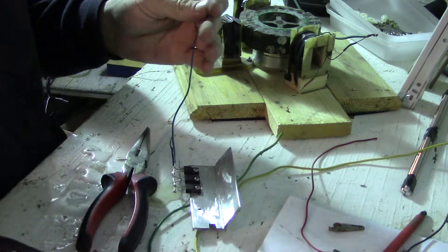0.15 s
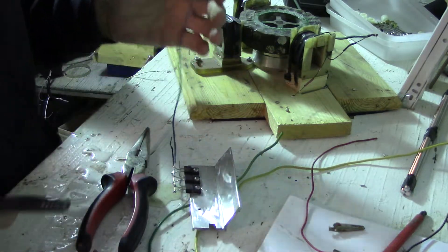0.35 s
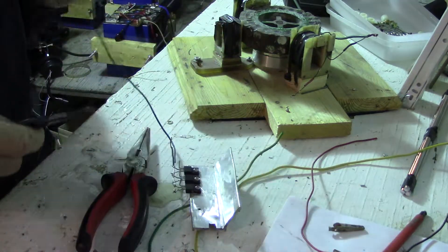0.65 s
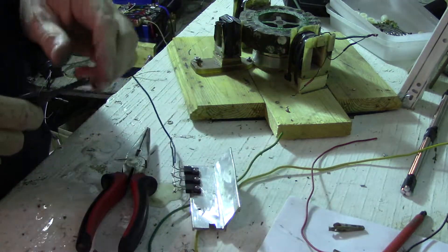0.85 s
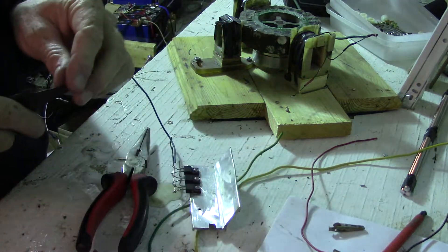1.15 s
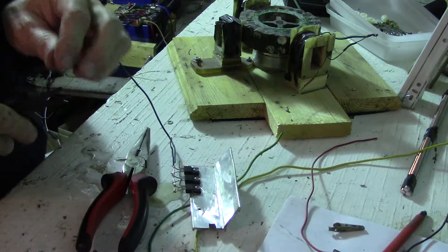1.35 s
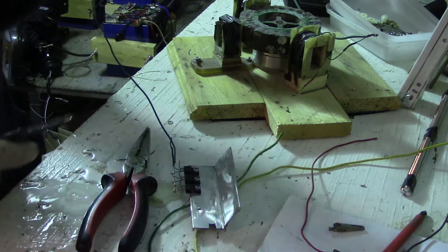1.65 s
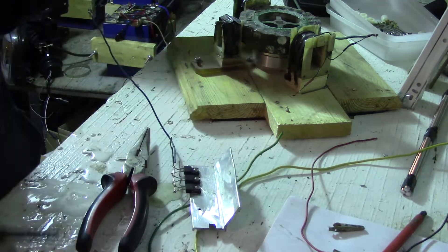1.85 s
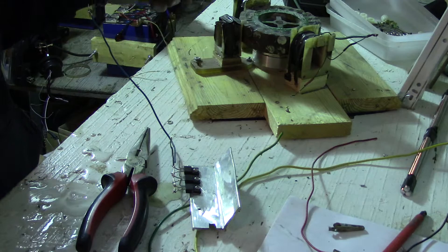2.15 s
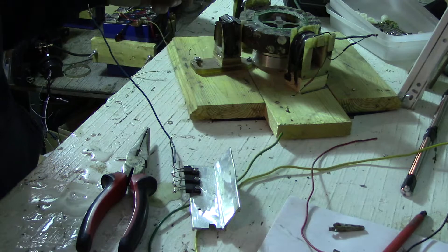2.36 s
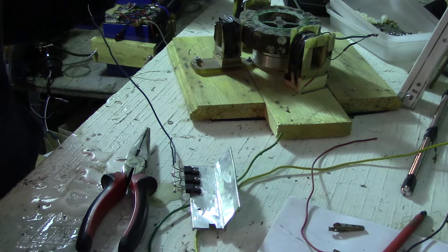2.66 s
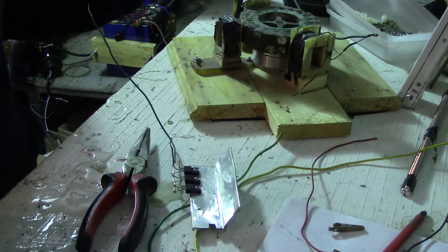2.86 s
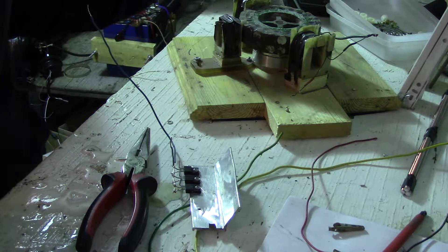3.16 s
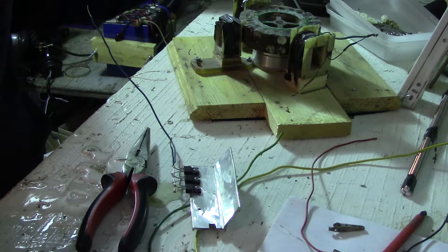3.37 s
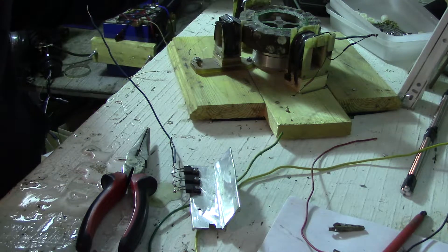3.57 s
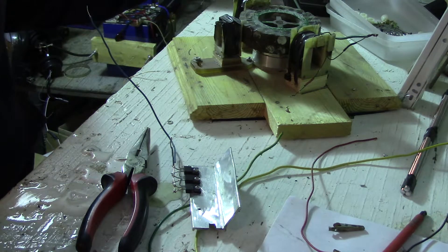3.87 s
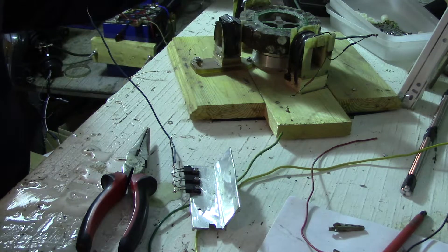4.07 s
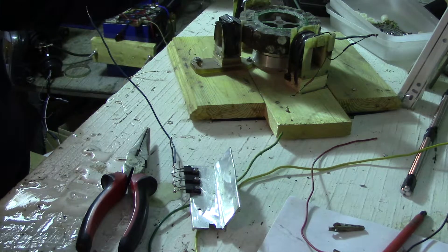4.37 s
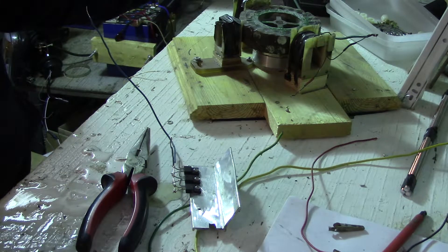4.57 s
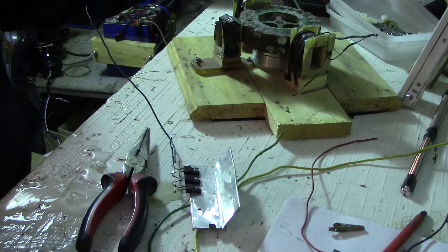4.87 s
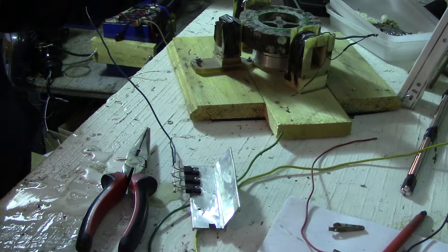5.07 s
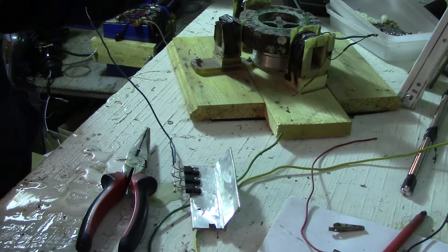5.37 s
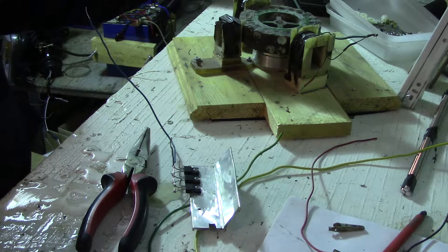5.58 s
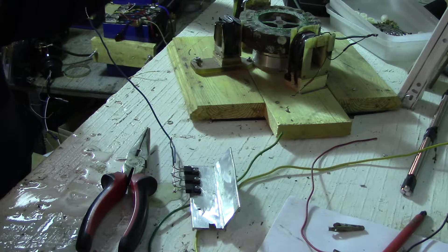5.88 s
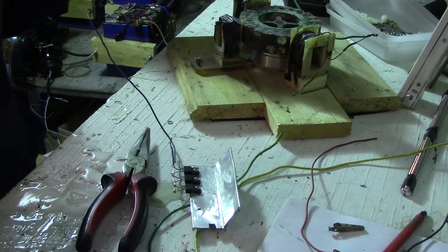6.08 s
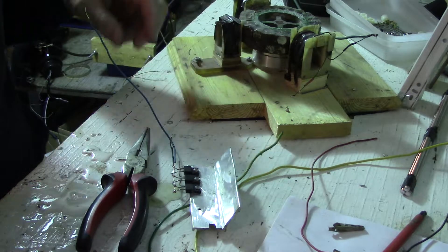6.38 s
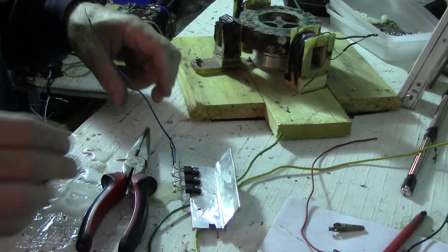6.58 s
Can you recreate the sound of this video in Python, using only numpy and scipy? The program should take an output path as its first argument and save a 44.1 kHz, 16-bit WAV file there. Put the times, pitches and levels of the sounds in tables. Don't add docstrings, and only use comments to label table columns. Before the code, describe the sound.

A steady electrical buzz fills a workbench while wire rubs and small metal clicks sound, then a tool drops and clatters loudly on the wood.

```python
import sys
import numpy as np
from scipy import signal
from scipy.fft import rfft, irfft, next_fast_len
from scipy.io import wavfile
from scipy.ndimage import uniform_filter1d

SR = 44100
rng = np.random.default_rng(int(sys.argv[2]) if len(sys.argv) > 2 else 0)


def dump(signal):
    limited = np.clip(np.atleast_2d(signal).T, -1, 1)
    pcm = np.round(limited * 32767).astype(np.int16)
    wavfile.write(sys.argv[1], SR, pcm)


def gain_from_db(level_db):
    decades = np.asarray(level_db, float) / 20
    return 10 ** decades


N = 296793
BUZZ_HZ = 120.033
OPPOSED = np.array([[1], [-1]])


def colour(x, points):
    hz, db = np.transpose(points)
    size = next_fast_len(x.shape[-1])
    f = np.maximum(np.fft.rfftfreq(size, 1 / SR), 1)
    gain = gain_from_db(np.interp(np.log(f), np.log(hz), db, left=-90, right=-90))
    return irfft(rfft(x, size) * gain, size)[..., :x.shape[-1]]


def walk(rate):
    hold = int(SR / rate)
    steps = np.repeat(rng.standard_normal(N // hold + 1), hold)
    return 4 / 3 * uniform_filter1d(uniform_filter1d(steps, hold), hold)[:N]


def resonate(x, hz, width):
    b, a = signal.iirpeak(hz, hz / width, SR)
    return signal.lfilter(b, a, signal.lfilter(b, a, x))


def ring_modes(out, at_s, db, modes, stretch, scatter_db=1.5, detune=0.016, rise_s=0.0005):
    hz, mode_db, t60 = np.transpose(modes)[:, :, None]
    level_chance, pitch_chance, phase_chance = rng.standard_normal((3, len(modes), 1))
    start = int(at_s * SR)
    t = np.arange(min(SR // 4, N - start)) / SR
    swing = np.sin(2 * np.pi * hz * (1 + detune * pitch_chance) * t + 0.4 * phase_chance)
    decay_db = -60 * t / (t60 * max(stretch, .005))
    ringing = np.sum(gain_from_db(mode_db + scatter_db * level_chance + decay_db) * swing, axis=0)
    ringing *= 1 - np.exp(-t / max(rise_s, 1e-5))
    out[start:start + len(t)] += gain_from_db(db) * ringing / np.abs(ringing).max()


def crack(at_s, db, t60, points):
    out = np.zeros(N)
    t = np.arange(SR // 8) / SR
    for s, peak_db, decay in zip(at_s, db, t60):
        burst = colour(rng.standard_normal(len(t)), points)
        burst = burst * gain_from_db(-60 * t / max(decay, .003)) * (1 - np.exp(-t / 0.0001))
        start = int(s * SR)
        out[start:start + len(t)] += gain_from_db(peak_db) * burst / np.abs(burst).max()
    return out


# (multiple, level [dB rms])
HOUSING_MULTIPLES = [(2, -62), (3.5, -75), (4, -66), (5, -76), (6, -77), (8, -64), (9, -61), (10, -61),
                     (11, -68), (13, -73), (14, -74), (15, -72), (16, -67), (19, -67), (20, -80), (21, -77),
                     (24, -74), (25, -77), (26, -74), (29, -72), (30, -71), (31, -76), (32, -76), (33, -80),
                     (36, -71), (43, -75), (48, -78), (53, -76)]


def multiples():
    faint = np.setdiff1d(np.arange(12, 72), np.transpose(HOUSING_MULTIPLES)[0])
    faint_db = -77.5 - .26 * faint + 2.5 * rng.standard_normal(len(faint))
    tick, crest = np.arange(105, 126), 108.5
    ripple = np.abs(1 + .7 * np.exp(2j * np.pi * (tick - crest) / 4.7))
    tick_db = -93 - .6 * np.abs(tick - crest) + 20 * np.log10(ripple)
    return [*HOUSING_MULTIPLES, *zip(faint, faint_db), *zip(tick, tick_db)]


def hum():
    turn = 2 * np.pi * BUZZ_HZ * np.arange(N) / SR
    knots = np.linspace(0, N, 8)
    out = np.zeros(N)
    for k, db in multiples():
        gain = np.interp(np.arange(N), knots, gain_from_db(db + .5 * rng.standard_normal(len(knots))))
        lag = k * k / 5 + (k > 10) * (np.pi + (k - 10) / 4 * rng.standard_normal())
        if k >= 100:
            lag = (k - 112) ** 2 / 40
        out += gain * np.cos(k * turn - lag)
    return np.sqrt(2) * gain_from_db(1.36) * out


def sizzle():
    cycle = (np.arange(N) * BUZZ_HZ / SR) % 1
    spit = colour(rng.standard_normal(N), [(11500, -27), (12800, 1), (14300, 3), (15700, -10)])
    peaks = np.exp(-5 * np.minimum(cycle, 1 - cycle))
    return 3 * gain_from_db(-90) * peaks * spit / spit.std()


# (frequency [Hz], density [dB per Hz])
AIR_COLOUR = [(20, -22), (100, -5), (220, 0.5), (800, -4.5), (1500, -8.5), (6000, -17), (13500, -27.5),
              (15700, -34)]
# (frequency [Hz], side minus mid [dB])
AIR_WIDTH = [(20, -12), (100, -8.5), (500, -5.5), (1000, -7), (2000, -8), (3000, -6.5), (6000, -10.5),
             (15700, -13)]
# (frequency [Hz], width [Hz], mid level [dB], side level [dB])
FAN_WHISTLES = [(1340, 80, -12.5, -27), (2020, 100, -34, -36), (2390, 71, -20.5, -18.5)]


def air():
    mid, side, draught, aside = rng.standard_normal((4, N))
    mid = colour(mid, AIR_COLOUR)
    side = colour(colour(side, AIR_COLOUR), AIR_WIDTH)
    size = mid.std()
    for hz, width, mid_db, side_db in FAN_WHISTLES:
        unit = size * np.sqrt(SR / width)
        mid = mid + unit * gain_from_db(mid_db) * resonate(draught, hz, width)
        side = side + unit * gain_from_db(side_db) * resonate(aside, hz, width)
    swell = gain_from_db(-59.5 + .5 * walk(2.64))
    return swell / size * (mid + side * OPPOSED)


# (start [s], hold [s], hiss level [dB], scrape level [dB])
STROKES = [(0.0, 0.17, -76, -56.5), (0.3, 0.11, -76, -51.5), (0.45, 0.14, -67.5, -54.5),
           (.68, 0.066, -73.5, -58), (0.845, 0.37, -76.5, -63.5), (1.196, .08, -74, -65),
           (1.87, .03, -84, -85), (3.473, 0.064, -75.5, -66), (4.35, 0.035, -71.5, -59.5),
           (5.88, .03, -83, -80), (6.03, .012, -71.5, -59.5)]
# (frequency [Hz], density [dB per Hz])
CLOTH_HISS = [(700, -25), (1500, 9), (3000, 6), (5000, -1.5), (6200, 5), (8000, -3.5), (11000, -7.5),
              (15500, -20)]
# (frequency [Hz], width [Hz], level [dB])
SCRAPE_MODES = [(330, 210, -10.5), (564, 350, -14), (956, 174, -10), (2030, 160, -12.5)]


def rub():
    t = np.arange(N) / SR
    rise_db_s, fall_db_s = 108, 103
    hiss_gain, scrape_gain = np.zeros((2, N))
    for s, hold_s, hiss_db, scrape_db in STROKES:
        swelling_db = rise_db_s * np.maximum(s - t, 0)
        dying_db = fall_db_s * np.maximum(t - s - hold_s, 0)
        stroke = gain_from_db(-swelling_db - dying_db)
        hiss_gain = np.maximum(hiss_gain, gain_from_db(hiss_db) * stroke)
        scrape_gain = np.maximum(scrape_gain, gain_from_db(scrape_db) * stroke)
    mid, side = rng.standard_normal((2, N))
    grain = gain_from_db(1.5 * walk(120))
    noise = (mid + 0.1 * side * OPPOSED) * grain
    scrape = sum(gain_from_db(db) * resonate(noise, hz, width) for hz, width, db in SCRAPE_MODES)
    hiss = colour(noise, CLOTH_HISS)
    return gain_from_db(11.0) * hiss_gain * hiss / hiss.std() + scrape_gain * scrape / scrape.std()


# (frequency [Hz], level [dB], t60 [s])
TOOL_MODES = [(1422, -2, 0.1), (1503, -7.5, .06), (1680, 0.5, 0.07), (1737, -10.5, 0.06),
              (2133, -9.5, 0.054), (2218, 4.5, 0.032), (2750, -10.5, 0.06), (2980, -18, 0.079),
              (3420, -17, 0.06)]
# (frequency [Hz], density [dB per Hz])
WOOD_CRACK = [(150, -39), (300, -9.5), (550, 1), (800, -2.5), (1300, -17)]
# (frequency [Hz], density [dB per Hz])
LOOSE_RATTLE = [(500, -47), (1000, 17), (1500, 8.5), (2300, -3), (3200, -8), (4500, -17.5), (6500, -20.5)]
# (frequency [Hz], density [dB per Hz])
BRIGHT_CHINK = [(2500, -6), (3500, 4.5), (5000, 0.5), (7500, -2), (10300, -15.5), (12500, -18),
                (15500, -23)]


def strike(blows, board, thud, stretch):
    out = np.zeros(N)
    for s, board_db, thud_db, tool_db, _ in blows:
        ring_modes(out, s, board_db - 3.5, board, 0.72 * stretch, detune=0.011)
        ring_modes(out, s, thud_db + 0.5, thud, 0.85 * stretch, rise_s=0.0054, detune=0.02)
        ring_modes(out, s, tool_db - 1.5, TOOL_MODES, 0.54 * stretch, detune=0.012)
    s, board_db, _, tool_db, chink_db = np.transpose(blows)
    held = stretch * np.ones(len(s))
    out += crack(s, board_db - 12, 0.13 * held, WOOD_CRACK)
    out += crack(s, tool_db - 5.0, 0.13 * held, LOOSE_RATTLE)
    return out + crack(s, chink_db, 0.032 * held, BRIGHT_CHINK)


# (time [s], board [dB], thud [dB], tool ring [dB], chink [dB])
PART_BUMPS = [(0.0, -20.5, -30, -39.5, -42), (0.021, -26.5, -43, -65, -60), (0.035, -26.5, -58, -53, -50),
              (0.059, -36, -45, -48, -59), (0.084, -37, -55, -53, -59), (0.108, -37, -61, -57, -59),
              (0.274, -39.5, -55, -58, -60), (0.409, -43.5, -51, -45, -60), (2.946, -54, -52, -60, -62),
              (3.012, -49, -55, -44, -62), (4.344, -33, -64, -41.5, -48), (4.361, -35, -79, -38, -58),
              (4.375, -35, -46, -51, -52), (4.389, -35, -49, -46, -50), (4.41, -32, -52, -42, -47),
              (4.42, -42, -60, -57, -60), (6.055, -55, -45, -58.5, -65), (6.065, -42, -54, -48, -60)]
# (frequency [Hz], level [dB], t60 [s])
HOLLOW_MODES = [(237, -4.5, 0.66), (323, 10, 0.24), (391, 16, 0.11), (506, 5.5, 0.17), (597, 2, 0.35),
                (694, -21, 0.087)]
# (frequency [Hz], level [dB], t60 [s])
BENCH_THUD = [(143, -3.5, 0.23), (195.2, 13.5, 0.2), (219, 7, 0.17)]


def bump_part():
    return strike(PART_BUMPS, HOLLOW_MODES, BENCH_THUD, 0.5)


# (time [s], steel [dB], low ring
# [dB], top [dB], ring time [s])
SHARP_CLICKS = [(1.2655, -61, -60, -50, 0.023), (1.6648, -24.5, -41, -41, 0.032),
                (1.6705, -39, -44, -61, .03), (1.674, -35, -49, -54, 0.025), (1.9958, -42, -22, -50, 0.046),
                (2.012, -49, -60, -38.5, .015), (3.0012, -35, -36, -48, 0.01), (3.012, -33, -40, -43, 0.016),
                (3.019, -40, -56, -58, 0.023), (3.807, -47, -60, -57, .015), (3.893, -46, -61, -56, .015),
                (4.332, -48, -46, -70, .03), (6.016, -43, -47, -63, 0.066), (6.03, -42, -44, -66, 0.027)]
# (frequency [Hz], density [dB per Hz])
SNAP_COLOUR = [(1200, -15), (2200, -5), (3300, 7.5), (4300, 7.5), (5000, -2.5), (6500, 7), (7500, -8),
               (9000, -40.5)]
# (frequency [Hz], density [dB per Hz])
SNAP_EDGE = [(6500, -9), (8000, 6), (9300, -2), (11000, -4), (12500, -23)]
# (frequency [Hz], level [dB], share of the ring time)
JAW_MODES = [(3346, -16, 0.56), (3290, 12, 0.93), (4460, 8, 0.55), (6280, -23, 0.68), (6800, -10, 0.92)]
# (frequency [Hz], level [dB], share of the ring time)
JAW_LOW_MODES = [(1800, -4.5, 1), (2300, 6, 0.27), (2540, -4, 0.96)]


def clicks():
    s, steel_db, low_db, top_db, t60 = np.transpose(SHARP_CLICKS)
    out = crack(s, steel_db - 3.0, t60, SNAP_COLOUR)
    out += crack(s, top_db, 0.76 * t60, SNAP_EDGE)
    for at_s, steel, low, decay in zip(s, steel_db, low_db, t60):
        ring_modes(out, at_s, steel - 8, JAW_MODES, .7 * decay, detune=.02, rise_s=.0003)
        ring_modes(out, at_s, low - 3.0, JAW_LOW_MODES, decay, detune=0.022, rise_s=0.00039)
    return out


# (time [s], board [dB], thud [dB], tool ring [dB], chink [dB])
LAY_BLOWS = [
    (2.0015, -11, -25, -18, -36),
    (2.011, -19, -29, -18.5, -38),
    (2.021, -20, -27, -42, -54),
    (2.044, -26, -40, -44, -60),
    (2.065, -30, -58, -55, -62),
]
# (frequency [Hz], level [dB], t60 [s])
BLOCK_MODES = [(400, -18, .07), (500, -29, 0.069), (597, 3.5, 0.1), (728, -2, 0.12), (842, -4, 0.072),
               (890, 4, 0.037), (1053, -7.5, 0.12), (1180, -3.5, 0.19), (1260, -1, 0.076)]
# (frequency [Hz], level [dB], t60 [s])
BLOCK_THUD_MODES = [(143, -6.5, 0.2), (242, 3, 0.23)]


def lay_tool():
    return strike(LAY_BLOWS, BLOCK_MODES, BLOCK_THUD_MODES, 0.81)


# (time [s], level [dB], t60 [s])
PALM_LANDINGS = [
    (6.068, -33, 0.085),
    (6.085, -40.5, 0.12),
]
# (frequency [Hz], level [dB], share of the ring time)
PALM_BENCH_MODES = [(80.5, 5.5, 0.91), (120, -11.5, 0.73)]


def land_palm():
    out = np.zeros(N)
    for s, db, t60 in PALM_LANDINGS:
        ring_modes(out, s, db, PALM_BENCH_MODES, t60, rise_s=.006, detune=.004)
    return out


# (time [s], board [dB], thud [dB], tool ring [dB], chink [dB])
DROP_BLOWS = [(6.1255, 5.5, -51, -14.5, -26.5), (6.135, -13, -21.5, -13.5, -36),
              (6.149, -7, -21.5, -14.5, -33), (6.189, -10, -27, -27.5, -45.5),
              (6.204, -11.5, -15.5, -22, -36.5), (6.234, 5, -17.5, -16, -38), (6.242, -8, -21, -5, -23),
              (6.251, -3, -52, -32, -26), (6.26, -5.5, -20.5, -9, -27), (6.287, -9.5, -40, -21, -47),
              (6.297, -8.5, -27, -21.5, -31), (6.3045, -2, -21, -1.5, -17.5), (6.329, -16.5, -34, -42, -52),
              (6.346, -33, -45, -39, -50), (6.359, -12, -33, -25.5, -37), (6.367, -36, -21.5, -43, -54),
              (6.394, -19.5, -35, -43, -59)]
# (frequency [Hz], level [dB], t60 [s])
BOARD_MODES = [(447, -25, 0.051), (482, 0.5, 0.147), (542, -2.5, 0.13), (566, 1, 0.063), (692.7, 1.5, 0.12),
               (811, -16.5, 0.21), (906, -7.5, 0.082), (1016, -5.5, 0.097), (1116, -3, 0.076),
               (1210, -10.5, 0.15)]


def drop_tool():
    return strike(DROP_BLOWS, BOARD_MODES, BENCH_THUD, 1)


# (time [s], level [dB], t60 [s])
STEEL_PINGS = [
    (6.244, -37, .012),
    (6.25, -40, .012),
    (6.306, -30, .012),
]
# (frequency [Hz], level [dB], share of the ring time)
STEEL_PING_MODES = [(11350, -4, 0.66), (11100, -7.5, 0.46)]


def ping_steel():
    out = np.zeros(N)
    for s, db, t60 in STEEL_PINGS:
        ring_modes(out, s, db, STEEL_PING_MODES, t60, rise_s=.0003, detune=.004)
    return out


# (frequency [Hz], t60 [s])
ROOM_DECAY = [(100, 0.39), (500, 0.24), (1500, 0.24), (5000, 0.38), (14000, 0.062)]


def room(x):
    t = np.arange(SR // 2) / SR
    hz, t60 = np.transpose(ROOM_DECAY)
    mid, side = rng.standard_normal((2, len(t)))
    side = colour(side, [(30, -71), (600, -20), (1200, -20), (4000, -18.5), (16000, -15.0)])
    noise = mid + side * OPPOSED
    tail = 0
    for centre in 60 * 2. ** np.arange(0, 8.1, .5):
        edges = [centre / 2 ** .25, centre * 2 ** .25]
        band = signal.butter(1, edges, "band", fs=SR, output="sos")
        decay_s = np.interp(np.log(centre), np.log(hz), t60)
        tail = tail + signal.sosfilt(band, noise) * gain_from_db(-60 * t / decay_s)
    tail = tail * (1 - np.exp(-t / 0.0023))
    return signal.fftconvolve(x[None], tail / np.sqrt(np.sum(tail[0] ** 2)), axes=1)[:, :N]


# (frequency [Hz], level [dB])
PORT_DIFFERENCE = [(30, -58), (600, -26.5), (1200, -20.5), (4000, -16.5), (16000, -12)]


def place_hits(hits):
    scatter = rng.standard_normal(128) / np.sqrt(128)
    apart = colour(signal.fftconvolve(hits, scatter)[:N], PORT_DIFFERENCE)
    hits = hits + apart * OPPOSED + gain_from_db(-13.5) * room(hits)
    return signal.sosfilt(signal.butter(3, 95, "high", fs=SR, output="sos"), hits)


def scene():
    hits = bump_part() + clicks() + lay_tool() + land_palm() + drop_tool() + ping_steel()
    mix = hum() + sizzle() + air() + rub() + place_hits(hits)
    return mix * gain_from_db(np.array([[-.2], [.2]]))


def band_limit(x):
    return signal.sosfilt(signal.butter(12, 15770, fs=SR, output="sos"), x)


def record(dry):
    mix = np.tanh(0.84 * dry) / 0.96
    return band_limit(mix)


dry = scene()
out = record(dry)
dump(out)
```